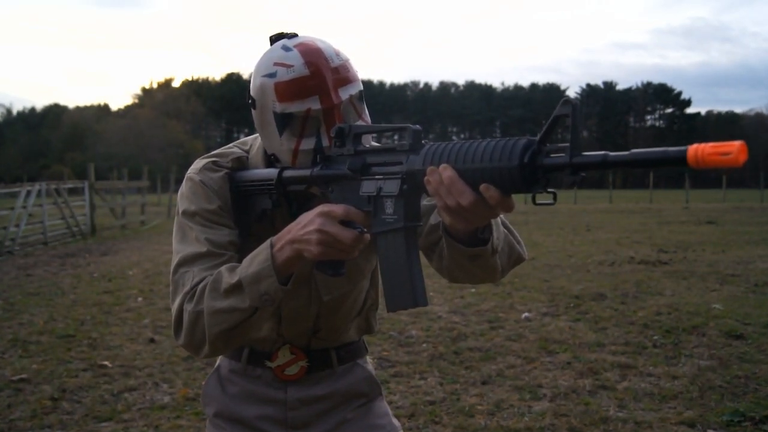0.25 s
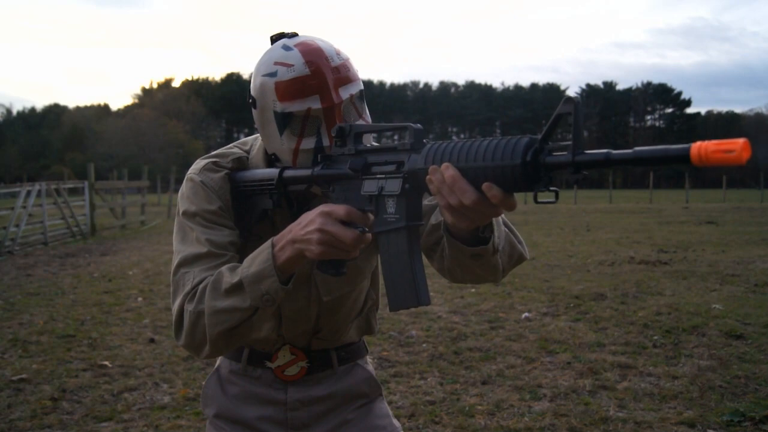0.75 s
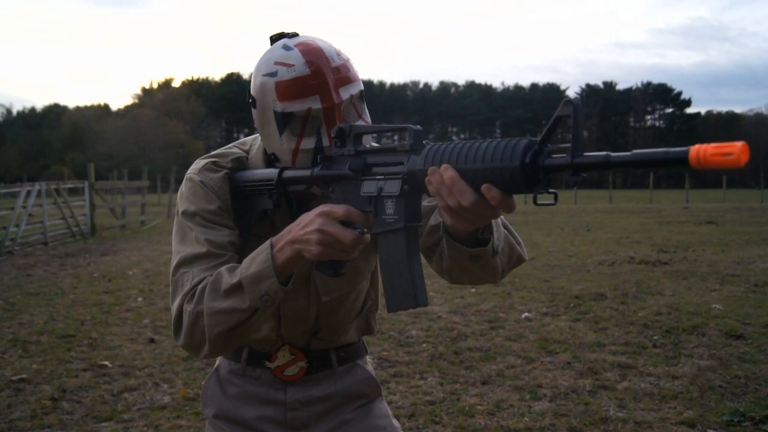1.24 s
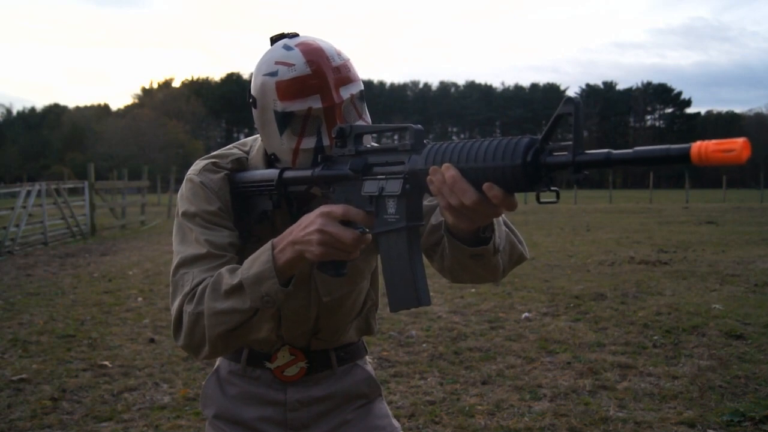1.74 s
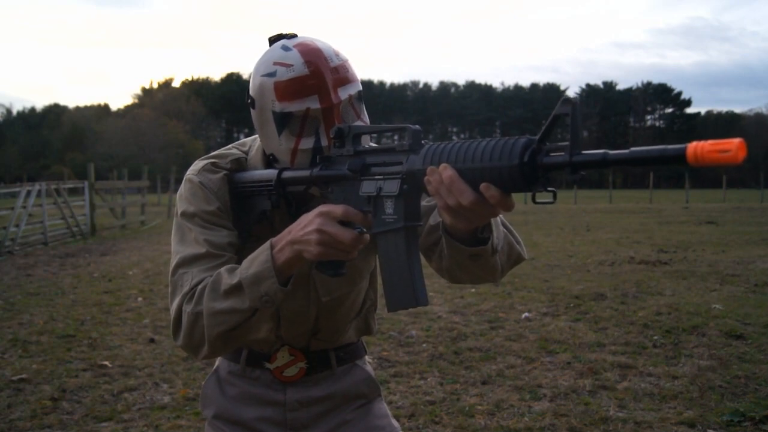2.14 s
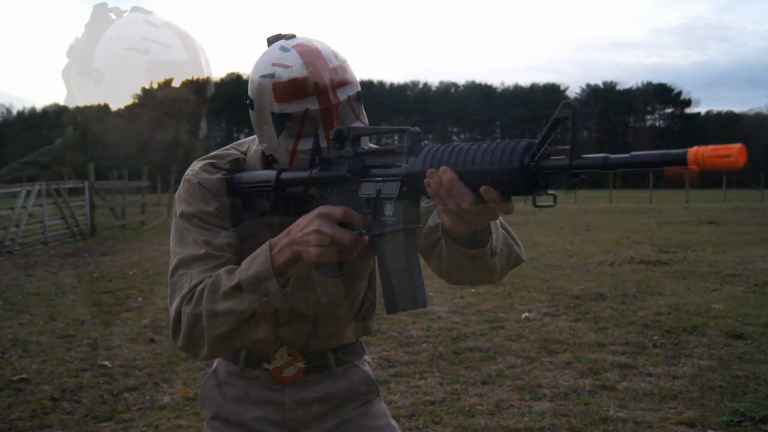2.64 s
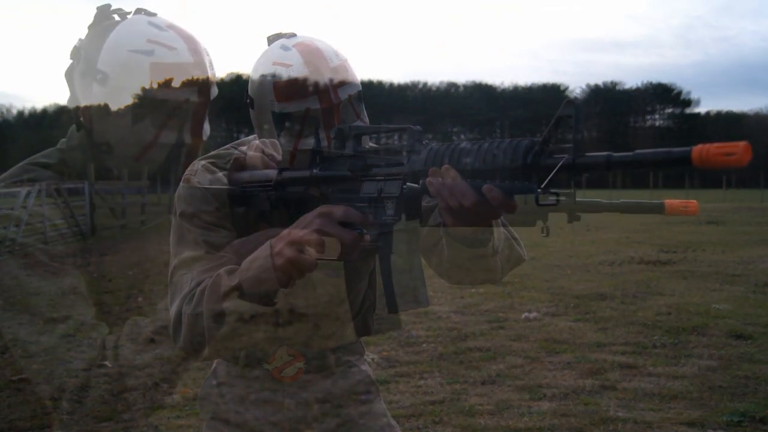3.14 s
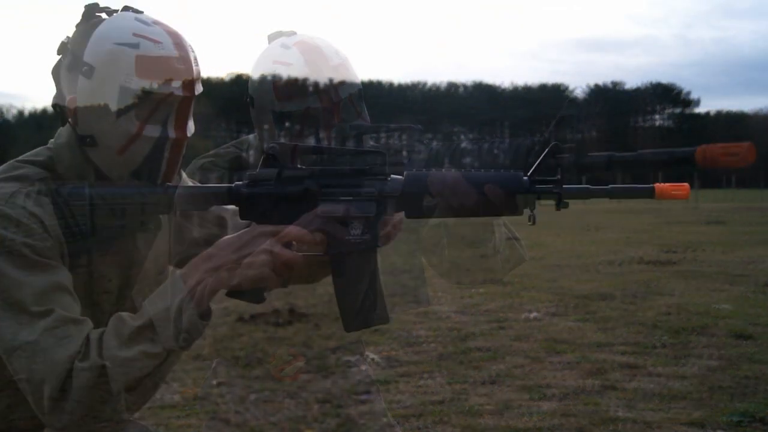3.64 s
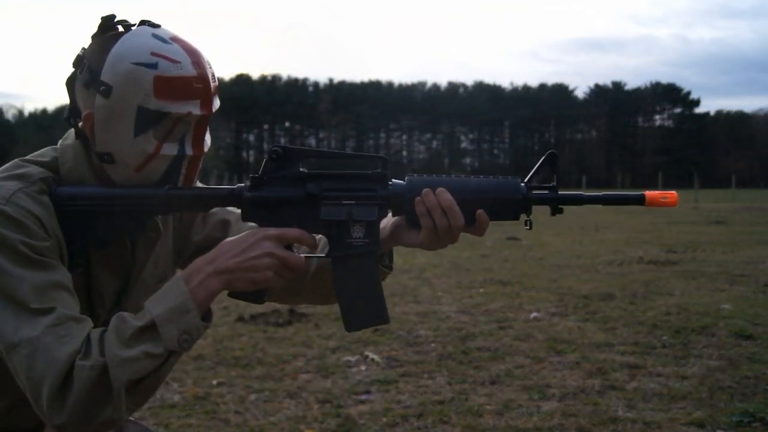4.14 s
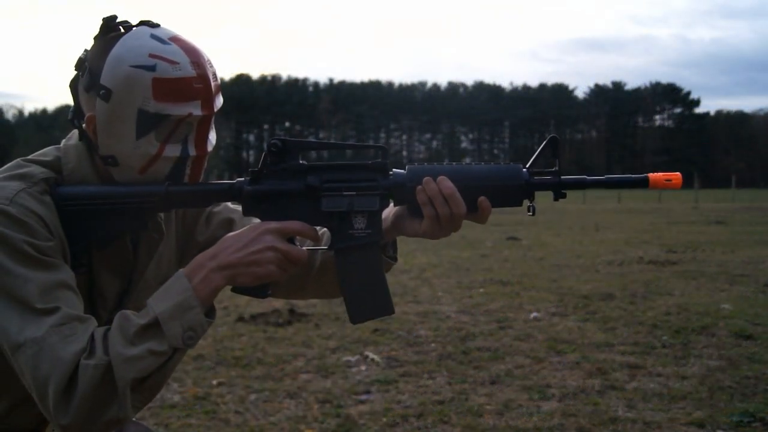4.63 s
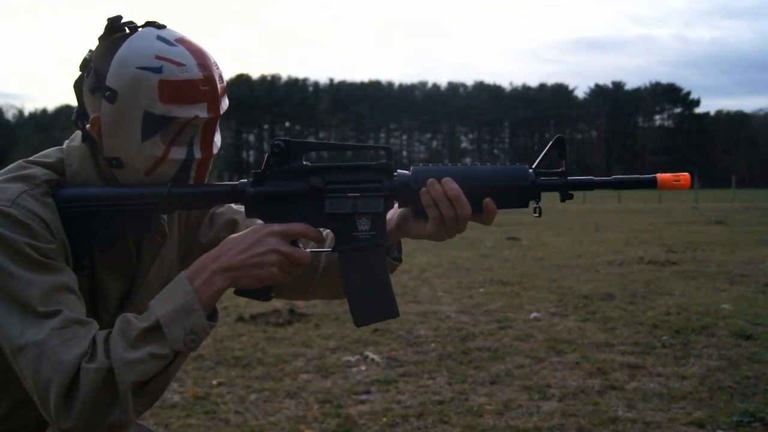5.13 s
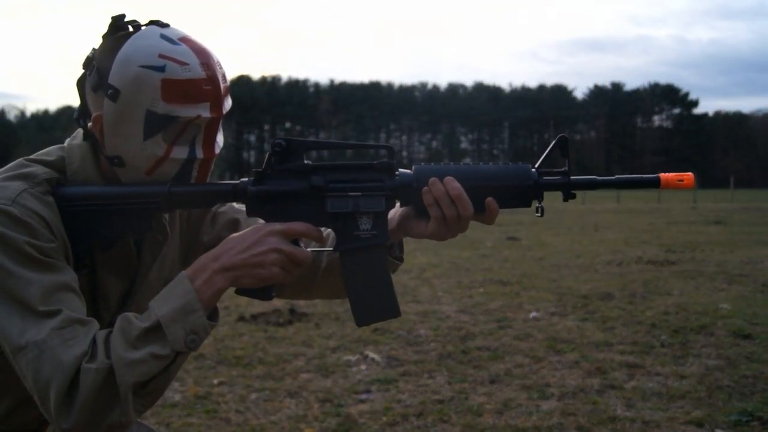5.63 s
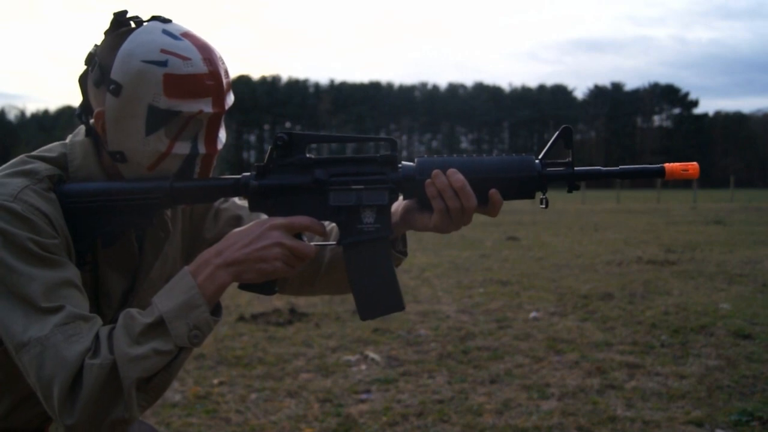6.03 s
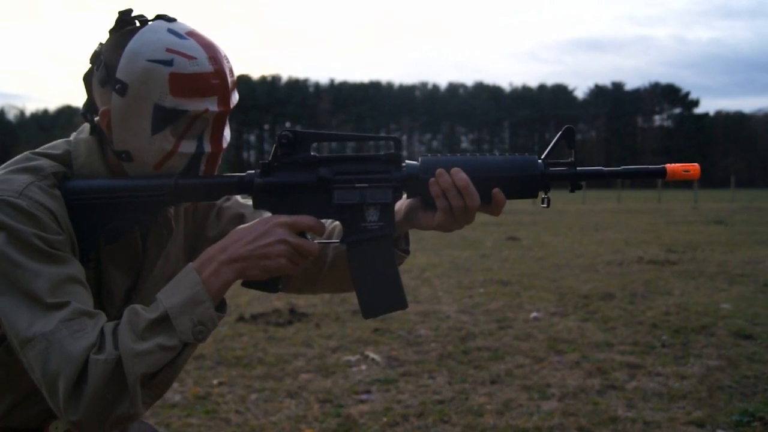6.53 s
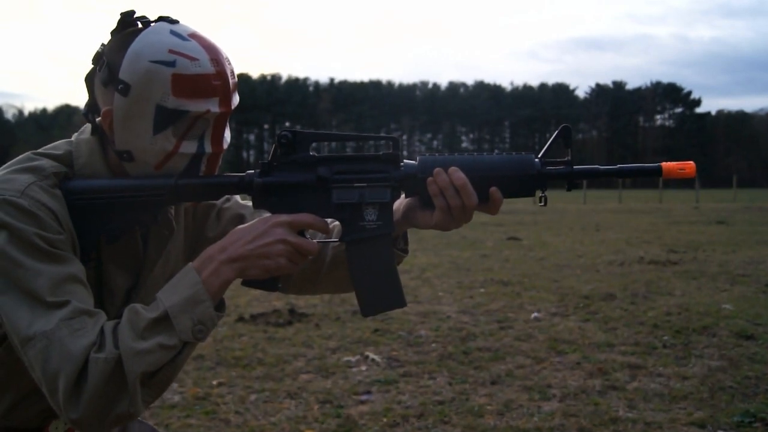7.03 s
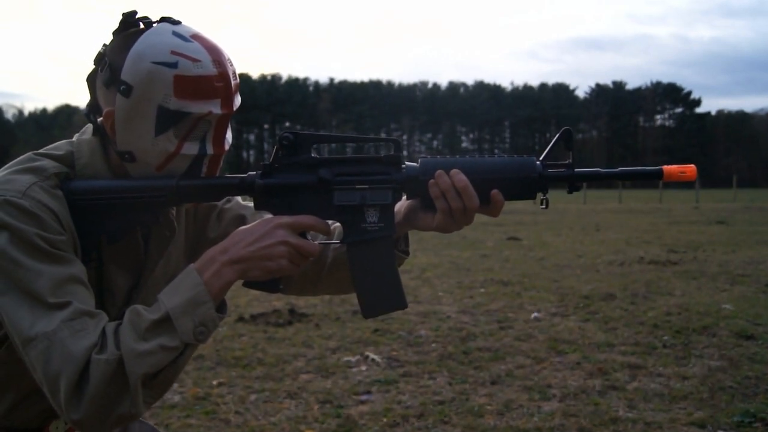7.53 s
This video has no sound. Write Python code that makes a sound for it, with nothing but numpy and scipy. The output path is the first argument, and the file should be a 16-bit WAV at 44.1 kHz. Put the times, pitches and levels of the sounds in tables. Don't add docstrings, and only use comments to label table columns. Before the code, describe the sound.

Outdoors in an open field, with a soft steady hush, faint rumble and distant traffic, a gas-powered toy rifle works close to a stereo microphone. At the very start the bolt clacks shut, with small ticks after it. From about 0.5 to 0.9 seconds a quick burst rattles: hard metallic clacks, about thirteen per second, with short gas puffs and steel ringing. A second run follows from 1.37 to 1.83, then light ticks and a brief hiss near 2.1. Small wind bumps thump around 2.3 to 2.6. At 3.2 the cocking handle is drawn with clicks, and at 3.5 it slams home with a ringing clank. Single shots crack at 4.9 and 6.5, each a tight double clack of bolt back and forward; pellets knock a far board at 5.07 and 6.66. A faint echo fades, leaving quiet air until about 7.8.

```python
import sys
import numpy as np
from scipy import signal
from scipy.fft import rfft, irfft, next_fast_len
from scipy.io import wavfile
from scipy.ndimage import uniform_filter1d

SR = 44100
rng = np.random.default_rng(int(sys.argv[2]) if len(sys.argv) > 2 else 0)


def volts_from_decibels(level):
    exponent = np.asarray(level, float) / 20
    return 10 ** exponent


def unload_wav(signal):
    wavfile.write(
        sys.argv[1],
        SR,
        np.round(np.clip(np.atleast_2d(signal).T, -1, 1) * 32767).astype(np.int16),
    )


N = 342657

# f/Hz, level/dB
HUSH_COLOUR = [(350, -28), (600, -13), (674, -7.5), (771, -0.5), (890, 1), (1100, -6), (1240, -10),
               (1390, -29.5), (1500, -14), (1820, -14.5), (2240, -20), (2380, -43), (2520, -24),
               (2830, -11), (3460, -29.5), (3780, -17.5), (4300, -18), (4580, -14.5), (4850, -22.5),
               (6000, -28), (7800, -57), (13200, -120)]
# t/s, level/dB
HUSH_LEVEL = [(0, 7), (1, 7.5), (2, 5.5), (2.7, 3.5), (3.1, 2), (3.8, 4.5), (5.5, 4.5), (7.8, 4.5)]
# f/Hz, likeness/0-1, phase/rad
HUSH_SAME = [(160, 0.22, -5), (727, 0.45, 0.5), (1130, 0.17, -7), (1860, 0.35, 2), (2389, 0.081, -5),
             (3110, .45, -1), (3900, 0.082, -3.5), (4130, 0.23, -1), (4940, 0.11, -1.3)]
# f/Hz, level/dB
FLOOR_COLOUR = [(30, 20), (90, 5.5), (200, 23), (480, 24.5), (620, 13), (2400, -21), (6000, 0), (10000, -8),
                (14000, -12.5), (17000, -23.5)]
# f/Hz, level/dB
WIND_COLOUR = [(25, -7), (60, -12), (150, -2), (300, 1), (500, -11), (1500, -85)]
# t/s, level/dB
WIND_LEVEL = [(0, -70.5), (1.9, -68), (2.5, -60.5), (3, -73.5), (3.33, -53), (3.7, -69), (4.5, -73.5),
              (5, -68), (5.9, -74.5), (6.5, -80.5), (7.8, -73)]
# t/s, peak level/dB, f/Hz
BUMPS = [(2.345, -40.5, 244.5), (2.62, -46, 239), (2.1, -44.5, 205), (2.3, -44.5, 299), (2.358, -42.5, 317),
         (2.567, -47, 261), (2.598, -45, 222), (2.634, -41, 301), (3.228, -39.5, 301), (3.34, -66, 266),
         (3.395, -41, 333), (4.427, -47, 185), (4.592, -46, 234), (5.123, -48, 236), (5.87, -45.5, 246)]

EDGES_HZ = [700, 1400, 3300, 7000, 16500]
# f/Hz, level/dB
RIFLE_COLOUR = [(180, -50), (300, -1), (407, 14.5), (613, -13.5), (714, -7.5), (1060, -3.5), (1390, -17),
                (1800, 1), (2390, -10), (2690, 0), (3360, -6), (4260, 3), (12200, -14), (16100, -23.5),
                (18000, -56)]
# f/Hz, level/dB, 60 dB decay/s
STEEL_RINGS = [(5200, -13.5, 0.049), (7400, -22, 0.076)]
# f/Hz, level/dB
RIFLE_BALANCE = [(60, -1.5), (180, 0), (550, 0.5), (1000, 2), (1900, 0), (4970, -2), (15000, -4)]
MUZZLE_DB = (-1, -.5, -2.5, -4)
UNLIKE = (.1, .3, .4, .7)

# t/s, level/dB, brightness/dB, 60 dB decay/s
HAMMERS = [
    (0.012, -40.5, 7, 0.034),
    (.507, -31, 8, 0.042),
    (1.3742, -22, 3.5, 0.051),
    (1.724, -25, -2, 0.043),
    (4.8974, -28, -10.5, 0.034),
    (6.4862, -19.5, 1.5, 0.028),
]
# t/s, level/dB, brightness/dB, 60 dB decay/s, delay/s
KICKS = [(0.5124, -15.5, 3.5, 0.0098, 0.0058), (0.58, -20, -4, 0.015, 0.0061),
         (0.6518, -20.5, 3, 0.017, 0.0072), (0.7289, -20, 9, 0.011, 0.0063), (0.7926, -21, 2, 0.031, 0.014),
         (1.3838, -26.5, 1.5, 0.0097, 0.0072), (1.441, -26, 5, 0.066, 0.017),
         (1.526, -18.5, 3.5, 0.012, 0.0063), (1.6, -21.5, 4.5, 0.026, 0.0064),
         (1.6747, -17, 4, 0.0057, 0.0066), (1.7302, -16.5, -1.5, 0.0016, 0.0056),
         (4.9024, -16, 6, 0.011, 0.0068)]
# t/s, level/dB, brightness/dB, 60 dB decay/s
STOPS = [(0.077, -43, 8, 0.033), (0.5312, -17.5, -0.5, 0.058), (0.603, -20.5, -3.5, 0.048),
         (0.6904, -34, 0, 0.075), (0.7503, -38, -4.5, 0.1), (0.8169, -16, 2, 0.033), (0.89, -38, 4, 0.018),
         (1.3971, -16.5, 1.5, 0.046), (1.4747, -26.5, -6.5, 0.025), (1.504, -41.5, 2, 0.076),
         (1.5595, -35.5, 4.5, 0.057), (1.6227, -38, 2.5, 0.11), (1.702, -37.5, 6, 0.039),
         (1.746, -31, 2.5, 0.032), (1.7541, -14.5, 1, 0.024), (1.774, -36.5, 5.5, 0.064),
         (1.8279, -43, 0, .02), (4.9143, -10, -1.5, 0.013), (4.973, -39, -5.5, 0.15),
         (6.5032, -13, 3, 0.019), (6.5265, -34, -3, 0.21), (0.5358, -28.5, -2, .015), (1.403, -27, 0, .015),
         (1.764, -32, -0.5, .012), (1.811, -36, 2.5, .015), (4.962, -34.5, 0, 0.016),
         (4.984, -40, 3.5, .015), (6.553, -36, 3.5, .012), (6.565, -35.5, 1.5, .012),
         (6.574, -47.5, 2, 0.0122), (.824, -26.5, 0.5, .015), (1.636, -36.5, 1.5, .02),
         (1.71, -34, 3, .015), (.628, -37, 3, .03), (.675, -36.5, 5, .03), (.764, -39, 2, .015),
         (1.422, -36, 1.5, .03), (.61, -30, -5, .015), (1.648, -45, -1, .02), (4.9234, -31, 0, .012),
         (6.508, -23.5, -6, .015)]
# t/s, level/dB, brightness/dB, 60 dB decay/s, scrape level/dB
SLAMS = [(0.044, -16, 2.5, 0.022, -28), (0.5703, -18, 5, 0.028, -24.5), (0.642, -18, 3, 0.031, -26),
         (0.7198, -14, 4, 0.015, -33.5), (.788, -17.5, 2.5, 0.016, -34.5), (.858, -17, -2.5, 0.024, -28),
         (1.437, -16.5, 2, 0.0091, -24), (1.5163, -16.5, 3.5, 0.031, -31.5),
         (1.5915, -16.5, -1.5, 0.026, -30), (1.6662, -18, 0.5, 0.038, -28), (1.7933, -18, 0, 0.033, -30.5),
         (4.952, -18.5, 3.5, 0.022, -28), (6.541, -16, -0.5, 0.024, -33.5)]
# t/s, level/dB, brightness/dB, 60 dB decay/s
TICKS = [(.1449, -43, 9, 0.066), (.2416, -49.5, 15, 0.031), (.2672, -53, 5, .023), (.2733, -54, 5.5, 0.18),
         (.3325, -48, 15, .029), (.3579, -57.5, 2, 0.19), (.4829, -48.5, -8, .02), (1.0131, -55, 4.5, 0.12),
         (1.0497, -43, 6.5, 0.017), (1.078, -56, 9.5, .03), (1.096, -62, 13, .015), (1.148, -61, 6.5, .02),
         (1.3512, -48, -4, .015), (1.8544, -56, 17, 0.018), (1.9251, -51, -3.5, 0.041),
         (2.0695, -60, 15, .01), (2.0758, -48, 7, 0.03), (2.117, -58, 1, .05), (2.1772, -59, 9, .03),
         (2.227, -64, 7, .016), (3.0669, -58, -6, 0.025), (3.7829, -48, -9.5, 0.016),
         (4.8794, -52, -6, .016), (6.4675, -50.5, -12, 0.013), (.068, -46.5, 8, .025),
         (.094, -54.5, 8, .015), (.114, -52, 11, .015), (.172, -55, 8, .02), (.202, -61.5, 11.5, .015),
         (.298, -60, 2.5, .02), (.388, -60.5, -0.5, .015), (1.005, -66, 14, .015), (1.04, -55, 8, .012),
         (1.328, -65, -1.5, .015), (1.934, -59, 15, .012), (2.0343, -61, 11, .012), (2.102, -54, 15, .015),
         (3.329, -63, 0, .015), (.7815, -35.5, 5, .03), (1.55, -31.5, 2.5, .015), (2.087, -46, 6, .015),
         (2.118, -51, 2, .02)]
# t/s, level/dB, brightness/dB, 60 dB decay/s
HANDLE = [(3.221, -47.5, 6, 0.023), (3.239, -64, -17, 0.04), (3.248, -37.5, 5, 0.014),
          (3.2638, -42, -3, 0.035), (3.2739, -32, 3, 0.027), (3.296, -26.5, -2, 0.014),
          (3.2978, -21.5, 5, 0.016), (3.304, -27.5, -11, 0.0068), (3.345, -67, 9, .015),
          (3.366, -70, 10, .015), (3.473, -66.5, 2, .012), (3.479, -55, 2, 0.026), (3.5016, -57, 9, .04),
          (3.5074, -44.5, 26.5, 0.029), (3.5168, -28, -9.5, .03), (3.5204, -17.5, 4.5, 0.026),
          (3.5312, -23.5, 6.5, 0.012)]
# t/s, level/dB, brightness/dB, 60 dB decay/s
POPS = [(0.5865, -32.5, 0, 0.011), (0.6618, -29.5, -5.5, 0.013), (1.452, -28.5, 2, .012),
        (1.4575, -32, 3.5, 0.015), (1.6085, -31, -1.5, .015), (1.684, -28.5, -1.5, .012),
        (4.91, -27.5, 11, .015), (6.494, -24.5, 4, 0.011), (1.392, -27.5, -1.5, .012),
        (1.533, -31.5, 1, .012)]

HAMMER_DB = (-2, 3, 1.5, -1)
KICK_DB = (-4, 5, 3.5, -2.5)
STOP_DB = (-6.5, -4, 0, -6)
SLAM_DB = (-8.5, -3.5, 3, -3.5)
TICK_DB = (-4, -3, 6, -2)
HANDLE_DB = (0, -1, -2.5, -11)
RATTLE_DB = (-24.5, -32, -21.5, -35)
PELLET_DB = (-16, -5.5, -9, -13.5)

# start t/s, hold/s, level/dB, brightness/dB
BLASTS = [
    (0.503, 0.0051, -25, -22),
    (1.368, .004, -46, -16),
    (1.717, 0.013, -23.5, -21),
    (3.498, .014, -49.5, -12),
    (3.511, 0.038, -37, -6.5),
    (4.894, 0.0057, -29.5, -16),
    (6.48, 0.021, -24, -12),
]
# start t/s, hold/s, fade/s, level/dB, brightness/dB
LEAKS = [(0, 0.013, 0.19, -39, -11.5), (0.52, 0.36, .064, -46, -8.5), (1.384, 0.42, 0.19, -50.5, -13),
         (3.202, 0.094, .04, -66, -15), (3.35, 0.04, 0.067, -71, -20), (3.591, 0.025, .11, -54.5, -15),
         (4.916, 0.043, 0.035, -40.5, -8), (5.54, 0.03, .091, -64.5, -30), (6.529, .022, 0.034, -60, -10.5)]
# start t/s, hold/s, fade/s, level/dB, brightness/dB
FAR_LEAKS = [(2.067, 0.035, 0.12, -51, -3.5)]

# f/Hz, level over the strike/dB, 60 dB decay/s
HAMMER_MODES = [(1080, -3, 0.012), (1920, -8, 0.0091), (2760, -5, .012), (4050, -3, .012)]
KICK_MODES = [(1100, -4.5, 0.036), (1780, -1, 0.0067), (2760, -9.5, 0.014), (3840, -4.5, 0.028),
              (5300, -4, 0.016)]
STOP_MODES = [(880, -13.5, .025), (1730, -12, 0.013), (2940, -2, 0.0099), (3960, -6, 0.025),
              (4760, -1, 0.0081), (5550, -8.5, 0.021)]
SLAM_MODES = [(1156, -15.5, .022), (1620, -22, 0.02), (2750, 0, 0.013), (3620, -1, 0.011), (4400, 1, 0.011),
              (6200, -4, 0.007)]
NEAR_SLAM_MODES = [(3260, -1, 0.016), (3900, 2.5, 0.014), (4600, -5.5, 0.011), (5300, -4, .01)]
PUSH = {"hammer": (-1.4, 430, -0.0014), "kick": (-9.5, 410, 0.0001), "stop": (-6.5, 434, 0.00052),
        "slam": (-22.5, 350, 0.00015)}
# t/s, peak level/dB, f/Hz
THUDS = [
    (.509, -55.5, 69.8),
    (1.722, -51, 80),
    (3.517, -47, 59.6),
    (4.9, -44.5, 109.5),
    (4.912, -31.5, 211),
    (6.485, -45.5, 80.2),
]
# t/s, f/Hz, peak level/dB, 60 dB decay/s
CHIMES = [(.734, 4500, -42, .12), (.735, 6950, -37, .1), (.725, 7500, -30, .03), (.745, 3300, -38, .08),
          (.8, 6900, -38, .05), (.051, 7300, -40, .05), (.628, 7000, -37, .03), (.647, 7600, -33, .03),
          (1.456, 7000, -36, .04), (1.501, 6950, -35, .06), (1.541, 7000, -38, .05),
          (1.797, 8800, -35, .06), (1.803, 7300, -35, .04), (1.8, 13450, -56, .3), (3.208, 7000, -66, .2),
          (3.298, 810, -23, .035), (3.305, 1615, -45, .2), (1.0495, 5900, -41, .01),
          (3.308, 1895, -36, .05), (3.508, 7200, -32, .045), (3.508, 11160, -35, .033),
          (3.52, 990, -13, .04), (3.519, 1950, -26, .04), (3.534, 5200, -27, .095), (3.533, 4760, -32, .04),
          (3.529, 3050, -23, .03), (3.531, 6900, -38, .1), (3.533, 3300, -30, .09), (3.549, 1010, -27, .07),
          (3.535, 8900, -44, .1), (3.532, 980, -20, .04), (4.918, 4700, -38, .07), (4.922, 7000, -38, .08),
          (4.9525, 910, -18, .04), (4.954, 10800, -37, .06), (4.96, 7000, -41, .06),
          (6.5415, 920, -19, .043), (2.085, 1850, -41, .03), (2.115, 1850, -43, .06),
          (.1445, 5900, -33, .018), (3.2478, 3050, -38, .015), (3.2745, 3050, -33, .025),
          (3.296, 4000, -22, .018), (3.239, 1000, -43, .07), (6.526, 1000, -31, .03),
          (6.544, 10700, -40, .08), (6.486, 1110, -22, .04), (4.898, 1100, -24, .03),
          (4.916, 825, -22, .035), (6.505, 800, -24, .035)]

# f/Hz, 60 dB decay/s
FIELD_DECAY = [(300, .3), (1000, 0.23), (3000, 0.94), (8000, 0.25), (15000, 0.3)]
# f/Hz, level/dB
FIELD_COLOUR = [(300, -37), (1000, -13), (3000, -23.5), (8000, -12.5), (15000, -18)]
# t/s, peak level/dB
TARGET_HITS = [
    (5.0668, -21),
    (6.6596, -21),
]
# f/Hz, level/dB, 60 dB decay/s
BOARD = [(830, -3, .03), (1000, 10, .021), (1150, 2, .03), (1780, -7, .011), (3100, -6, 0.014),
         (4000, 4, 0.012), (4400, 0, .012), (5250, -9, .008), (6400, -10, 0.006)]

SINGLES_FROM_S = 4
MUZZLE_LAG, PART_LAG = 4, 1.5


def evened(x):
    return x / np.sqrt(np.mean(x ** 2) + 1e-20)


def read(points, hz, order=1):
    columns = np.transpose(points)
    return np.interp(np.log(hz + 1), np.log(columns[0] + 1), columns[order])


def add(mix, s, sound):
    part = mix[..., round(s * SR):][..., :sound.shape[-1]]
    part += sound[..., :part.shape[-1]]


def ring(hz, t60, phase=0):
    t = np.arange(6000) / SR
    return volts_from_decibels(-60 * t / t60) * np.sin(2 * np.pi * hz * t + phase)


def ports(hz, lag):
    return np.pi * hz * lag / SR * np.array([[-1], [1]])


def thumps(rows, cycles, rise):
    out = np.zeros(N)
    for s, db, hz in rows:
        turns = np.arange(4000) / SR * hz
        shape = np.minimum(turns / rise, 1) * np.exp(-(turns / cycles) ** 2)
        add(out, s, volts_from_decibels(db) * np.sin(2 * np.pi * turns) * shape)
    return out


def pair(same):
    hz = np.fft.rfftfreq(N, 1 / SR)
    left, other = rfft(rng.standard_normal((2, N)))
    likeness = np.clip(read(same, hz), -1, 1)
    shared = likeness * left * np.exp(1j * read(same, hz, order=2))
    right = shared + np.sqrt(1 - likeness ** 2) * other
    return irfft(np.array([left, right]), N)


def patchy(source, colour, patchy_db, swell_db):
    hz, t, z = signal.stft(source, SR, nperseg=1024, noverlap=768)
    patches = rng.standard_normal(z.shape[1:])
    swell = evened(uniform_filter1d(patches[0], size=16))
    patches = uniform_filter1d(patches, size=10, axis=0)
    patches = evened(uniform_filter1d(patches, size=12, axis=1))
    z = z * volts_from_decibels(read(colour, hz)[:, None] + patchy_db * patches + swell_db * swell)
    return evened(signal.istft(z, SR, nperseg=1024, noverlap=768)[1][:, :N])


def hush():
    t = np.arange(N) / SR
    far_level = volts_from_decibels(-60.5 + np.interp(t, *np.transpose(HUSH_LEVEL)))
    far = far_level * patchy(pair(HUSH_SAME), HUSH_COLOUR, patchy_db=1.1, swell_db=.7)
    floor = volts_from_decibels(-61.5) * patchy(pair(HUSH_SAME), FLOOR_COLOUR, patchy_db=0.99, swell_db=.3)
    wind = patchy(rng.standard_normal((2, N)), WIND_COLOUR, patchy_db=0.91, swell_db=1.6)
    wind = wind * volts_from_decibels(np.interp(t, *np.transpose(WIND_LEVEL)))
    return far + floor + wind * volts_from_decibels(np.array([[-9], [3]]))


def puff_power():
    leak_swell_s = .011
    scrape_lead_s, scrape_swell_s = .006, .003
    valve_lead_s = .0065
    # start s, swell s, hold s, fade s, level dB, brightness dB
    bolt = [(s, min(leak_swell_s, s + 1 / SR), *rest) for s, *rest in LEAKS]
    bolt += [(s - scrape_lead_s, scrape_swell_s, scrape_lead_s - scrape_swell_s, .02, db, -12)
             for s, *_, db in SLAMS]
    blasts = [(s, 0.0021, hold, 0.023, db, bright_db) for s, hold, db, bright_db in BLASTS]
    bolt += [row for row in blasts if HANDLE[0][0] < row[0] < SINGLES_FROM_S]
    muzzle = [row for row in blasts if row not in bolt]
    muzzle += [(s, leak_swell_s, *rest) for s, *rest in FAR_LEAKS]
    muzzle += [(s - valve_lead_s, .002, valve_lead_s, .012, -27.5, -7) for s, *_ in KICKS]
    power = np.zeros((2, 4, N))
    for place, rows in zip(power, [bolt, muzzle]):
        for s, swell, hold, fade, db, bright_db in rows:
            t = np.arange(0, swell + hold + fade, 1 / SR)
            shape = np.minimum(t / swell, 1) ** 4 * volts_from_decibels(-60 * np.maximum(t - swell - hold, 0) / fade)
            bands_db = db + np.array([-3, -3.5, -3, bright_db])
            add(place, s, volts_from_decibels(2 * bands_db)[:, None] * shape)
    return power


def contacts():
    tilt = np.linspace(-1, 1, 4)
    kinds = [(1, HAMMERS, HAMMER_DB), (1, KICKS, KICK_DB), (0, STOPS, STOP_DB), (0, SLAMS, SLAM_DB),
             (1, TICKS, TICK_DB), (0, HANDLE, HANDLE_DB), (1, POPS, STOP_DB)]
    rows = [(place, s, *(db + bright_db * tilt + colour), t60) for place, table, colour in kinds
            for s, db, bright_db, t60, *_ in table]
    rows += [(1, s + delay, *RATTLE_DB, 0.019) for s, *_, delay in KICKS]
    return rows + [(0, s - .0008, *np.add(db, PELLET_DB), 0.02) for s, db in TARGET_HITS]


def strikes(longer=(1.1, .8, .6, .5), rise_s=(.001, .0007, .0005, .0004), rattle_db=-11, rattle_longer=4,
            snap_db=(12, 12, 7, -3)):
    power, snaps = np.zeros((2, 4, N)), np.zeros((2, 4, N))
    t = np.arange(6000) / SR
    all_signs = rng.choice([-1., 1.], size=(200, 4))
    for (place, s, *levels_db, t60), signs in zip(contacts(), all_signs):
        for k, (db, rise, factor) in enumerate(zip(levels_db, rise_s, longer)):
            decay = t60 * factor
            fall = volts_from_decibels(-120 * t / decay) + volts_from_decibels(2 * rattle_db - 120 * t / (decay * rattle_longer))
            add(power[place, k], s, volts_from_decibels(2 * db) * np.minimum(t / rise, 1) ** 2 * fall)
            snaps[place, k, round((s + rise) * SR)] += signs[k] * volts_from_decibels(db + snap_db[k])
    return power, snaps


def causal(db):
    log = np.log(volts_from_decibels(np.maximum(np.r_[db, db[-2:0:-1]], -100)))
    taps = np.fft.ifft(np.exp(log - 1j * signal.hilbert(log).imag)).real[:1024]
    return taps / np.linalg.norm(taps)


def receiver():
    pitch_spread, level_spread_db, delay_s = 0.043, -0.5, .0003
    phase_scatter = 0.15
    half = np.array([[.5], [-.5]])
    runs = [row for row in SLAMS if row[0] < SINGLES_FROM_S]
    singles = [row for row in SLAMS if row[0] > SINGLES_FROM_S]
    kinds = [(HAMMERS, HAMMER_MODES, 1), (KICKS, KICK_MODES, 1), (STOPS, STOP_MODES, 0),
             (runs, SLAM_MODES, 0), (singles, NEAR_SLAM_MODES, 0), (POPS, STOP_MODES, 1)]
    out = np.zeros((2, N))
    for table, modes, place in kinds:
        for (s, db, *_), chance in zip(table, rng.uniform(-1, 1, size=(60, 6, 3))):
            for (hz, mode_db, t60), (u, v, w) in zip(modes, chance):
                side_db = place * np.interp(hz, EDGES_HZ[:-1], MUZZLE_DB) * half
                phase = ports(hz, place * MUZZLE_LAG) + phase_scatter * w * hz / 1000 * half
                level = volts_from_decibels(db + mode_db + level_spread_db * v + side_db)
                add(out, s + delay_s, level * ring(hz * (1 + pitch_spread * u), t60, phase))
    return signal.lfilter(*signal.butter(2, 450, "high", fs=SR), out)


def clatter(grain_db=3.0, steep_db=36, ring_db=-26):
    grain = evened(uniform_filter1d(rng.standard_normal(N), size=24))
    grain = evened(volts_from_decibels(grain_db * grain))
    power, snaps = strikes()
    shared = rng.standard_normal((2, 1, 1, N))
    own = rng.standard_normal((2, 1, 2, N))
    unlike = np.array(UNLIKE)[:, None, None]
    noise = np.sqrt(1 - unlike ** 2) * shared + unlike * own
    level = np.sqrt(power + puff_power()) * grain
    bolt, muzzle = level[:, :, None] * noise + snaps[:, :, None]
    side = volts_from_decibels(np.array(MUZZLE_DB) / 2)[:, None]
    left = np.roll(muzzle[:, 0], MUZZLE_LAG, axis=1) * side
    drive = bolt + np.stack([left, muzzle[:, 1] / side], axis=1)
    hz, out = np.linspace(0, SR / 2, 1025), np.zeros((2, N))
    for band, lo, hi in zip(drive, EDGES_HZ, EDGES_HZ[1:]):
        outside = np.maximum(np.log2(lo / (hz + 1)), 0) + np.maximum(np.log2((hz + 1) / hi), 0)
        taps = causal(read(RIFLE_COLOUR, hz) - steep_db * outside)
        out += signal.oaconvolve(band, taps[None])[:, :N]
    steel = sum(volts_from_decibels(db + ring_db) * ring(f, t60) for f, db, t60 in STEEL_RINGS)
    out += signal.oaconvolve(drive[2], steel[None])[:, :N]
    out += receiver()
    size = next_fast_len(N)
    tilt = volts_from_decibels(read(RIFLE_BALANCE, np.fft.rfftfreq(size, 1 / SR)) / 2)
    return irfft(rfft(out, size) * np.array([tilt, 1 / tilt]), size)[:, :N]


def pushes(pitch_spread=.25):
    rows = []
    for kind, table in [("hammer", HAMMERS), ("kick", KICKS), ("stop", STOPS + POPS), ("slam", SLAMS)]:
        push_db, hz, lead_s = PUSH[kind]
        rows += [(s - lead_s, db + push_db, hz * (1 + pitch_spread * rng.uniform(-1, 1))) for s, db, *_ in table]
    air = thumps(rows, cycles=1.53, rise=0.27)
    return signal.lfilter(*signal.butter(2, 130, "high", fs=SR), air)


def field(x):
    taps = rng.standard_normal((2, SR)) * (np.arange(SR) > 250)
    hz, t, z = signal.stft(taps, SR, nperseg=256)
    shape = volts_from_decibels(-60 * t / read(FIELD_DECAY, hz)[:, None])
    energy = 128 * (shape ** 2).sum(1, keepdims=True)
    shape *= volts_from_decibels(read(FIELD_COLOUR, hz))[:, None] / np.sqrt(energy)
    tail = signal.istft(z * shape, SR, nperseg=256)[1]
    return signal.fftconvolve(x.mean(0)[None], tail, axes=1)[:, :N]


def chimes(flutter_db=2, rise_s=.001):
    out = np.zeros((2, N))
    rise = np.minimum(np.arange(6000) / SR / rise_s, 1)
    for s, hz, db, t60 in CHIMES:
        phase = ports(hz, PART_LAG * np.sign(HANDLE[0][0] - s))
        add(out, s, volts_from_decibels(db) * ring(hz, t60, phase) * rise)
    flutter = evened(uniform_filter1d(rng.standard_normal(N), size=150))
    return out * volts_from_decibels(flutter_db * flutter)


def recoil():
    return thumps(THUDS, cycles=0.91, rise=0.34)


def wind_bumps():
    return thumps(BUMPS, cycles=1.37, rise=0.36) * volts_from_decibels(np.array([[-5], [3]]))


def target(rise_cycles=1.57, bounce_s=0.0047, bounce_db=-16, dull_db=-4):
    out, t = np.zeros((2, N)), np.arange(6000) / SR
    for s, hit_db in TARGET_HITS:
        for hz, db, t60 in BOARD:
            rise = np.minimum(t * hz / rise_cycles, 1)
            knock = volts_from_decibels(hit_db + db) * ring(hz, t60, ports(hz, -1)) * rise
            add(out, s, knock)
            octaves = np.log2(hz / BOARD[0][0])
            add(out, s + bounce_s, volts_from_decibels(bounce_db + dull_db * octaves) * knock)
    return out * volts_from_decibels(np.array([[.8], [-.8]]))


def scene():
    rifle = clatter() + pushes() + recoil()
    return hush() + rifle + field(rifle) + chimes() + wind_bumps() + target()


def roll_off(x):
    return signal.sosfilt(signal.butter(12, 17970, fs=SR, output="sos"), x)


def record(dry):
    ceiling = .41
    rounded = dry / (1 + abs(dry / ceiling) ** 4) ** (1 / 4)
    top = signal.firwin(63, 16600, window=("kaiser", 4), fs=SR)
    return roll_off(signal.oaconvolve(rounded, top[None], "same"))


dry = scene()
out = record(dry)
unload_wav(out)
```